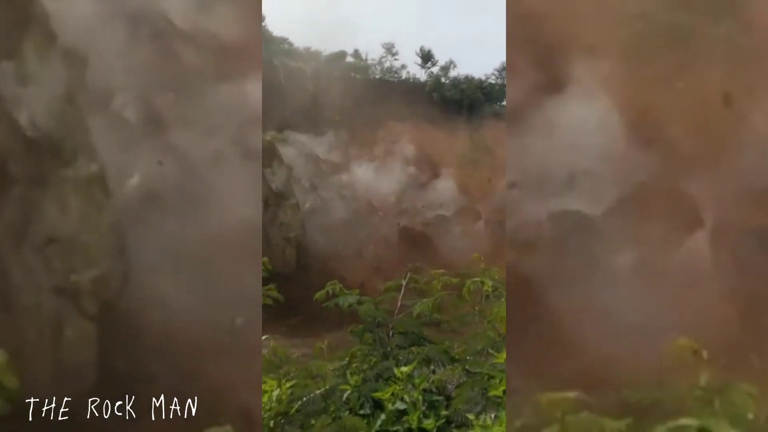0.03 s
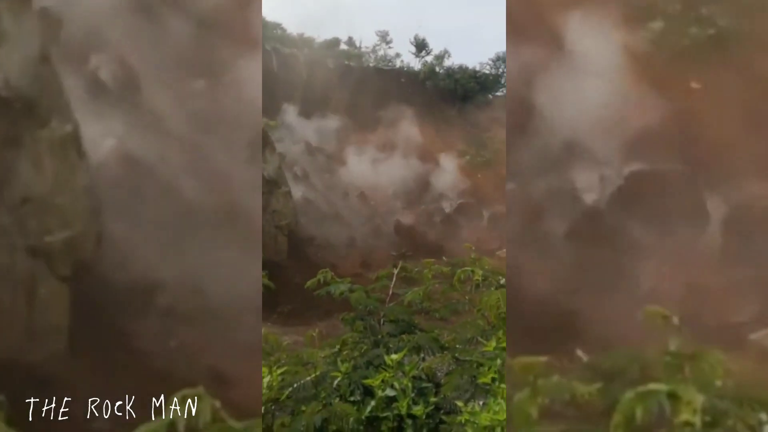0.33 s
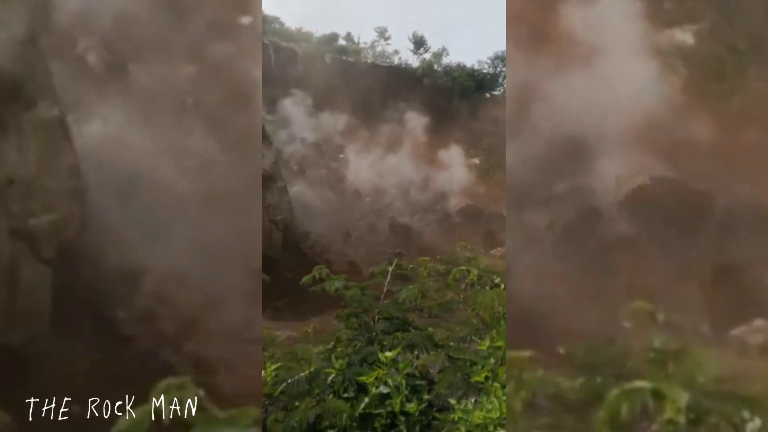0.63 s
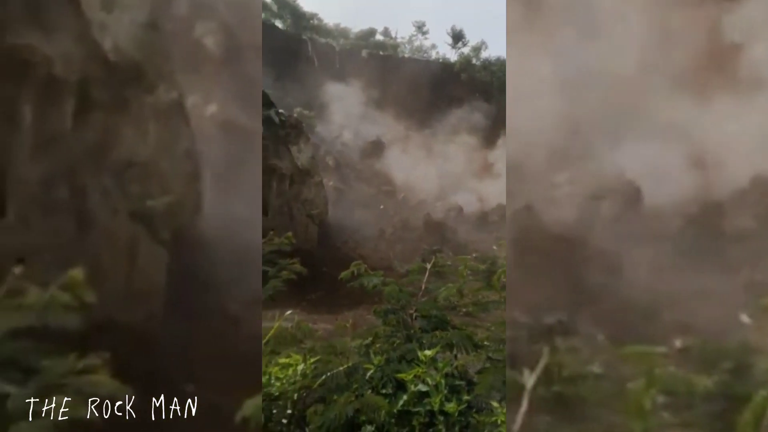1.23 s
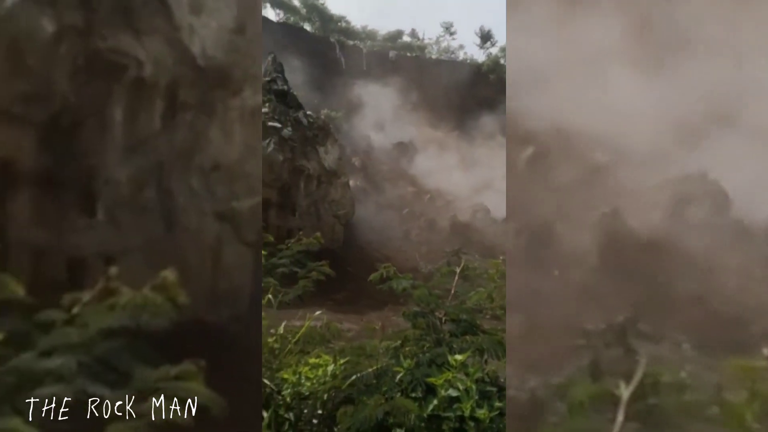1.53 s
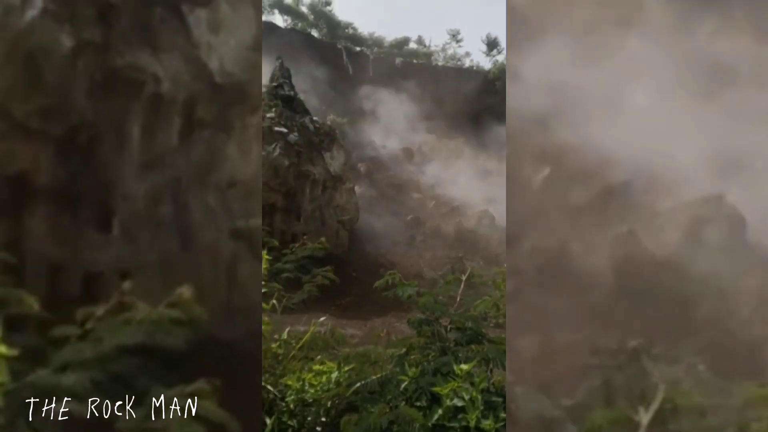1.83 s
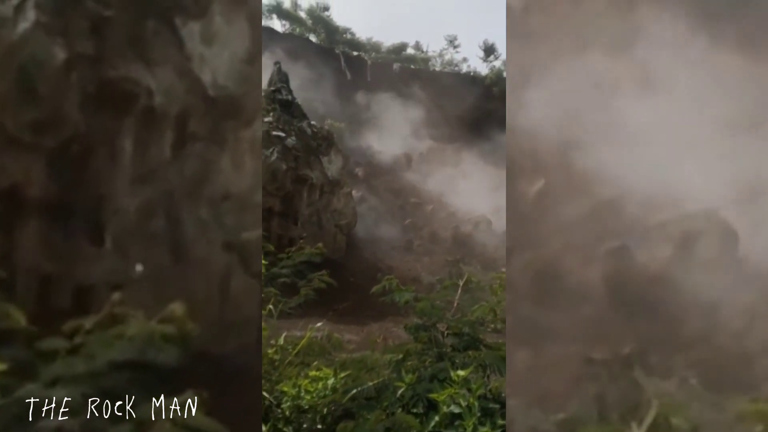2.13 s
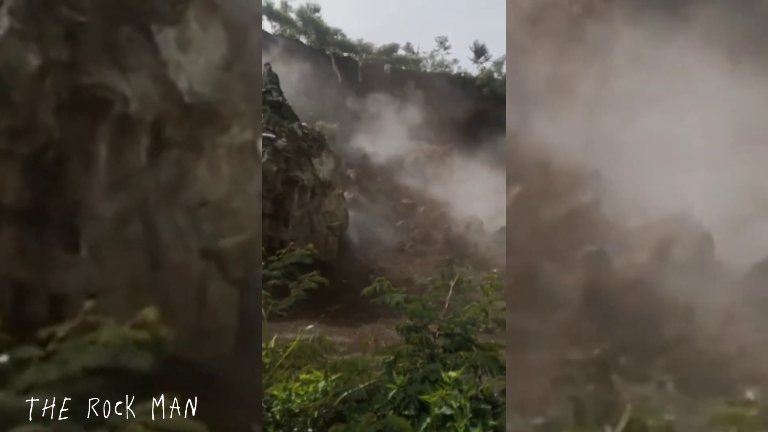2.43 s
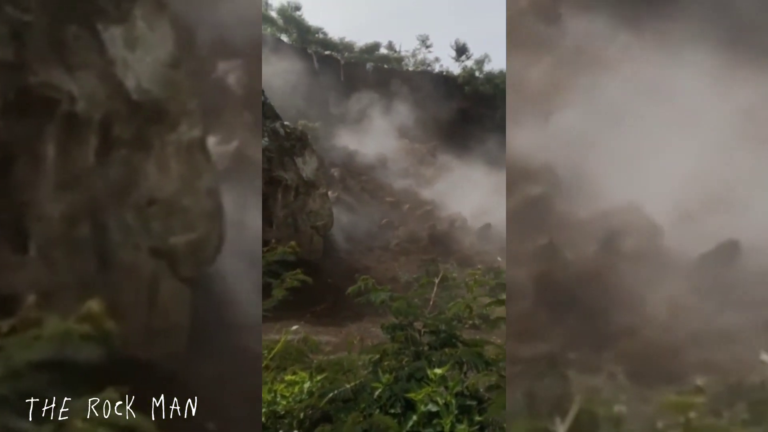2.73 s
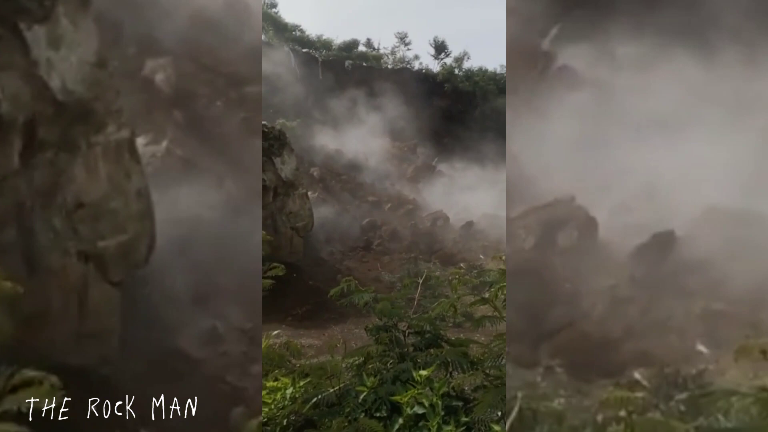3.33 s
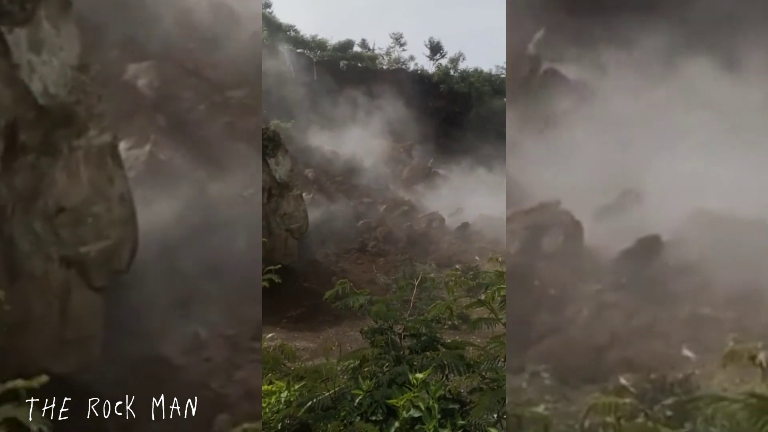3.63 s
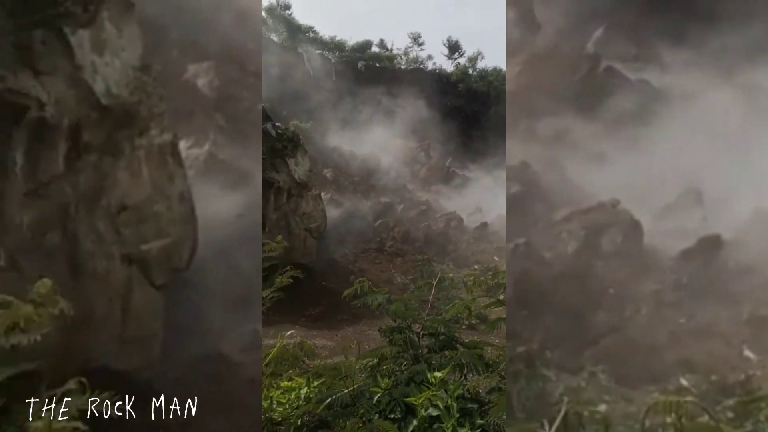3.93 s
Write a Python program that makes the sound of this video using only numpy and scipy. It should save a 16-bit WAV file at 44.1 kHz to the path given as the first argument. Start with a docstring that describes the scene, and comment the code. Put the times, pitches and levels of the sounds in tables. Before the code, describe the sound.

A landslide rumbles down a cliff with thudding boulders and clattering rubble, gradually settling.

```python
"""A landslide runs out down a quarry cliff, heard from the foot of the slope on a phone's two microphones.
It opens in full flow: countless blocks rumble, rubble clatters, gravel slides, grit and rock chips hiss.
At once stones knock and pebbles tick close by; then boulders tumble in bursts of thuds, heaviest
in the first two seconds. After that the flow thins out as the slope settles, and single stones
and a few late boulders knock through to the end."""
import sys
import numpy as np
from scipy import signal
from scipy.fft import rfft, irfft
from scipy.io import wavfile
from scipy.ndimage import uniform_filter1d

SR = 44100
rng = np.random.default_rng(int(sys.argv[2]) if len(sys.argv) > 2 else 0)


def dump_mix(stems):
    """Bounce the given channels to the path in sys.argv[1] as a 16-bit WAV at rate SR."""
    frames = np.atleast_2d(stems).T  # one column per channel
    limited = np.clip(frames, -1, 1)  # hard clip at full scale
    pcm = np.round(limited * 32767).astype(np.int16)
    wavfile.write(sys.argv[1], SR, pcm)


N = 176400


def undb(db):
    """Decibels to gain."""
    return 10 ** (np.asarray(db) / 20)


def curve(rows):
    """Rows of (t/s, value) joined by straight lines."""
    return np.interp(np.arange(N) / SR, *np.array(rows).T)


def across(rows):
    """Rows of (f/Hz, value) joined on a log frequency axis."""
    hz, value = np.array(rows, float).T
    return np.interp(np.log(np.fft.rfftfreq(N, 1 / SR) + 1), np.log(hz + 1), value)


def colour(x, spectrum):
    """Causal filter of unit power with the outline (f/Hz, level/dB)."""
    gain = undb(across(spectrum))
    gain /= np.sqrt(np.mean(gain ** 2))
    cepstrum = irfft(np.log(gain), N)
    cepstrum[1:N // 2] *= 2  # fold to minimum phase
    cepstrum[N // 2 + 1:] = 0
    return irfft(rfft(x) * np.exp(rfft(cepstrum)), N)


def surge(per_s=69):
    """Smooth random wandering with a spread of 1."""
    width = int(SR / per_s)
    wander = rng.standard_normal(N)
    for _ in range(2):
        wander = uniform_filter1d(wander, width, mode="wrap")
    return wander / wander.std()


def ring(hz, t60, attack):
    """One damped vibration with a soft start; times in seconds."""
    t = np.arange(SR // 4) / SR
    return np.sin(2 * np.pi * hz * t) * undb(-60 * t / t60) * (1 - np.exp(-t / attack))


def burst(t60, seconds):
    """Noise that dies away by 60 dB in t60 seconds."""
    t = np.arange(int(seconds * SR)) / SR
    return rng.standard_normal(len(t)) * undb(-60 * t / t60)


def add(out, at, sound):
    """Mix a sound in at a time in seconds."""
    i = int(at * SR)
    out[i:i + len(sound)] += sound[:max(N - i, 0)]


def pan(left_db):
    """Two gains that put the left left_db above the right."""
    return undb(np.array([[.5], [-.5]]) * left_db)


# The phone's microphones, left over right: f/Hz, level/dB
MIC_BALANCE = [(150, 0), (300, 0.5), (430, 1.95), (560, 12), (790, 4), (950, 11), (1130, 2), (1350, 5),
               (1520, 5.5), (1700, 0.7), (1930, 3.5), (2160, -3), (2420, 1), (2700, 3.5), (3050, 2.14),
               (3500, 4.1), (4300, 9.9), (5200, 7), (7000, 7.1), (12000, 11.6)]
# Lead of the left microphone: f/Hz, phase/rad
MIC_LEAD = [(0, 0), (130, .36), (260, 1.2), (520, 2.5), (800, 0), (1000, 6.5), (1300, 7.5), (2000, 7),
            (2500, 8.5), (3500, 10.5), (4600, 12), (5800, 15.5), (7600, 21.5)]
# Likeness of the two: f/Hz, coherence/0-1
MIC_LIKENESS = [(100, .999), (300, 0.91), (480, 0.88), (650, 0.63), (880, 0.098), (1050, 0.65),
                (1450, 0.94), (1700, 0.58), (2500, 0.66), (3500, 0.14), (8000, 0.12)]
def microphones(direct, scattered=None):
    """The right microphone hears later and shaded, with a share of any sound scattered by the cliff."""
    lag = np.interp(np.fft.rfftfreq(N, 1 / SR), *np.array(MIC_LEAD).T)
    right = rfft(direct) * np.exp(-1j * lag)
    if scattered is not None:
        alike = across(MIC_LIKENESS)
        right = alike * right + np.sqrt(1 - alike ** 2) * rfft(scattered)
    return np.array([direct, irfft(right * undb(-across(MIC_BALANCE)), N)])


def debris(flow, spectrum, gain_db, hits_per_s, spread_db, surge_db):
    """Random impacts that surge as the mass slides; spread_db lifts a few above the many weak ones."""
    strength = undb(spread_db * np.minimum(rng.exponential(size=(2, N)), 5))
    lands = rng.random((2, N)) < hits_per_s / SR
    hits = lands * strength * rng.choice([-1, 1], (2, N))
    direct, scattered = colour(hits / hits.std(), spectrum)
    return microphones(direct, scattered) * undb(curve(flow) + gain_db + surge_db * surge())


# Deepest bass at the foot of the slope: t/s, level/dB
GROUND_FLOW = [(0.0, -23.5), (0.3, -31), (0.44, -28.5), (0.7, -19), (0.76, -30.5), (1.0, -23), (1.38, -40),
               (1.41, -23.5), (1.87, -40), (1.96, -31), (3.32, -45), (3.4, -25.5), (3.55, -43), (4.0, -53)]
# Its spectrum: f/Hz, level/dB
GROUND_SPECTRUM = [(12, -16), (25, -10.5), (43, 6.5), (60, -3), (90, -3), (160, -76.5)]
def ground():
    """Impacts of equal strength blur into the deep bass of the heavy mass."""
    return debris(GROUND_FLOW, GROUND_SPECTRUM, gain_db=.5, hits_per_s=370, spread_db=0, surge_db=.5)


# The mass coming down the cliff: t/s, level/dB
RUMBLE_FLOW = [(0, -17), (.55, -19), (.7, -22.5), (.82, -20), (.95, -24), (1.14, -22.5), (1.24, -25.5),
               (1.33, -18.5), (1.5, -20), (1.6, -22.5), (1.82, -26.5), (1.95, -19.5), (2.08, -26),
               (2.36, -24), (2.46, -31), (3.25, -29.5), (3.33, -38.5), (3.44, -26.5), (3.59, -29.5),
               (3.75, -31.5), (4, -33)]
# Its spectrum: f/Hz, level/dB
RUMBLE_SPECTRUM = [(35, -17.5), (65, -3.5), (95, -2), (140, -1), (220, -4.5), (320, -5), (440, -16),
                   (560, -11.5), (1200, -71.5)]
def rumble():
    """Countless blocks collide and merge into a low rumble."""
    return debris(RUMBLE_FLOW, RUMBLE_SPECTRUM, gain_db=-1.5, hits_per_s=1600, spread_db=1.38, surge_db=1)


# Rubble on the slope: t/s, level/dB
RUBBLE_FLOW = [(0, -29.5), (.45, -30), (.53, -27.5), (.8, -31), (1.12, -31), (1.24, -33), (1.43, -32),
               (1.7, -35), (2.3, -37), (2.45, -40), (2.88, -39), (3.12, -36), (3.29, -42), (3.55, -38),
               (3.72, -37.5), (3.79, -40), (3.87, -37), (4, -37)]
# Its spectrum: f/Hz, level/dB
RUBBLE_SPECTRUM = [(200, -22), (400, -0.5), (520, -0.5), (660, 0), (790, -2.5), (960, 1), (1060, 0),
                   (1190, -7.5), (1350, -3), (1530, -2), (1700, -9), (1900, -9.5), (2400, -20), (4000, -60)]
def rubble():
    """Broken rock clatters in the midrange, in hits of nearly even strength."""
    return debris(RUBBLE_FLOW, RUBBLE_SPECTRUM, gain_db=5.5, hits_per_s=2500, spread_db=.5, surge_db=1.33)


# Gravel on the slope: t/s, level/dB
GRAVEL_FLOW = [(0, -27), (.45, -26.5), (.64, -25), (.8, -28.5), (1.15, -25), (1.21, -31), (1.36, -28.5),
               (1.5, -26.5), (1.61, -32), (2, -34.5), (2.4, -41), (2.65, -39), (3.2, -42.5), (4, -41.5)]
# Its spectrum: f/Hz, level/dB
GRAVEL_SPECTRUM = [(700, -22), (1400, -4.5), (1690, -6.5), (1850, -0.5), (1980, 3.5), (2130, -1.5),
                   (2330, 0), (2620, -3.5), (3100, -7), (5000, -59)]
def gravel():
    """Sliding gravel rattles in uneven hits around 2 kHz."""
    return debris(GRAVEL_FLOW, GRAVEL_SPECTRUM, gain_db=2, hits_per_s=5000, spread_db=3, surge_db=.6)


# Grit running down: t/s, level/dB
GRIT_FLOW = [(0, -31.5), (.25, -30.5), (.58, -29.5), (.72, -36), (1, -36), (1.18, -37.5), (1.3, -33.5),
             (1.49, -34.5), (1.58, -37.5), (2.1, -39.5), (2.48, -42.5), (2.68, -40), (3.22, -46.5),
             (3.39, -43), (3.7, -45), (4, -46.5)]
# Its spectrum: f/Hz, level/dB
GRIT_SPECTRUM = [(1500, -16), (2750, 6.5), (2980, -2.5), (3200, 1), (3480, -0.5), (3800, 2), (4200, 0),
                 (5200, -1), (6250, -4), (6850, -1.5), (7600, -7), (8100, -16), (8400, -52)]
def grit():
    """Tiny impacts come so densely that they hiss."""
    return debris(GRIT_FLOW, GRIT_SPECTRUM, gain_db=5, hits_per_s=12000, spread_db=3, surge_db=.64)


# Rock chips spilling: t/s, level/dB
CHIPS_FLOW = [(0, -42), (.27, -31), (.6, -33), (.8, -35.5), (1.05, -37), (1.3, -50), (2.2, -55), (4, -64)]
# Their spectrum: f/Hz, level/dB
CHIPS_SPECTRUM = [(2500, -26.5), (3450, -14), (3750, -2.5), (4200, 2.5), (4620, 5.5), (5200, -7.5),
                  (6200, -22), (8500, -55.5)]
def chips():
    """Sharp chips spill with the first rush, a few hitting far harder than the rest."""
    return debris(CHIPS_FLOW, CHIPS_SPECTRUM, gain_db=-.5, hits_per_s=5400, spread_db=4.5, surge_db=.5)


# Sand running down: t/s, level/dB
SAND_FLOW = [(0, -61), (.6, -60), (.75, -66), (1.5, -67), (1.7, -68), (4, -80)]
# Its spectrum: f/Hz, level/dB
SAND_SPECTRUM = [(9500, -25), (10700, 3), (14500, 0)]
def sand():
    """Falling grains fizz faintly above 10 kHz."""
    return debris(SAND_FLOW, SAND_SPECTRUM, gain_db=9, hits_per_s=10000, spread_db=2, surge_db=.7)


# Stones knocking on the quarry rock: t/s, level/dB, f/Hz, extra level of the crack/dB
STONE_KNOCKS = [(.051, -8, 933, 2), (.073, -13, 1020, 10.5), (.201, -18, 1990, 2), (.252, -10.5, 1897, 7),
                (.324, -11.5, 1920, 2), (.387, -21, 2174, 12), (0.497, -14, 1288, -12),
                (.508, -11, 1366, 8), (0.521, -13, 1380, 4.5), (.622, -9.5, 1944, 4.5),
                (.898, -14.5, 1970, -8), (1.028, -20, 2335, 5), (1.118, -21.5, 1223, -2),
                (1.154, -16.5, 960, 7), (1.564, -16.5, 970, 0), (1.715, -36, 1520, 11),
                (2.547, -21, 927, 4), (2.735, -20, 505, -8), (3.032, -30, 980, -8), (3.107, -17, 570, -3),
                (3.154, -24.5, 1350, 6), (3.19, -21, 570, -9), (3.358, -24.5, 1566, 9),
                (3.389, -25, 2640, 6), (3.445, -21, 910, -13), (3.639, -23, 1050, -12),
                (3.714, -20, 1078, -17.5), (3.808, -11, 544, -18)]
# Ring of a stone: ratio to its pitch, level/dB
STONE_MODES = [(1, 4), (1.3, -8), (1.659, -2), (1.88, -22)]
# Crack of a stone: f/Hz, level/dB
CRACK_SPECTRUM = [(300, -12.5), (900, 2.5), (2400, 3), (4500, -2.5), (7000, -16), (8500, -43)]
def stones(mode_scatter=.092, pieces=2):
    """Each stone knocks with a crack and a brief ring; weaker pieces land just after."""
    rings, cracks = np.zeros(N), np.zeros(N)
    for at, db, hz, crack_db in STONE_KNOCKS:
        for ratio, mode_db in STONE_MODES:
            mode_hz = hz * ratio ** (1 + mode_scatter * rng.standard_normal())
            add(rings, at, undb(db + mode_db) * ring(mode_hz, t60=.061, attack=.0004))
        splinters = [(late, -13.5) for late in rng.uniform(0, .022, pieces)]
        for late, piece_db in [(.00023, 0)] + splinters:
            add(cracks, at + late, undb(db + crack_db + piece_db) * burst(t60=.024, seconds=.2))
    return microphones(rings * undb(-6.5) + colour(cracks, CRACK_SPECTRUM) * undb(-9))


# Pebbles close to the phone: t/s, level/dB, 60 dB decay/s
PEBBLE_TICKS = [(0.088, -12.5, 0.026), (0.201, -13, 0.028), (.252, -11, 0.021), (.3875, -2, 0.0039),
                (.392, -13, .004), (1.239, -18, .003), (1.258, -10, 0.0036), (1.285, -18.5, 0.035),
                (1.478, -20.5, 0.17), (2.657, -27, 0.1), (3.357, -32, 0.016), (3.389, -32, 0.024)]
# Their spectrum: f/Hz, level/dB
TICK_SPECTRUM = [(1500, -23), (3000, -11), (4500, 5.5), (6000, 7.5), (7300, 5), (8400, -15.5), (10000, -34),
                 (14000, -18)]
def pebbles():
    """Pebbles land in bright ticks and short sprays."""
    ticks = np.zeros(N)
    for at, db, t60 in PEBBLE_TICKS:
        add(ticks, at, .5 * undb(db) * burst(t60, seconds=.1))
    return microphones(colour(ticks, TICK_SPECTRUM))


# Boulders tumbling down the slope: t/s, level/dB, f/Hz, length of the tumble/s
BOULDER_TUMBLES = [(.255, -13.5, 95, 0.024), (.295, -10.5, 207, 0.031), (0.657, -7.5, 132, 0.04),
                   (0.698, -9.5, 210, .06), (.77, -14, 233, 0.098), (.94, -14, 129, 0.027),
                   (1.01, -16, 207, 0.064), (1.304, -10.5, 120, 0.059), (1.388, -10.5, 298, 0.048),
                   (1.41, -16.5, 469, .04), (1.514, -12.5, 245, 0.044), (1.702, -16, 112, 0.028),
                   (1.895, -18, 116, .025), (1.922, -10.5, 109, .03), (1.943, -8.5, 106, 0.038),
                   (1.96, -15.5, 259, 0.049), (2.014, -15, 93, 0.0297), (2.15, -22, 75, 0.026),
                   (2.255, -21, 75, .04), (2.321, -19.5, 110, 0.038), (2.387, -20.5, 166, 0.019),
                   (2.396, -20, 316, .03), (2.742, -23, 103, 0.026), (3.079, -13, 306, 0.0203),
                   (3.104, -20, 323, 0.022), (3.41, -20.5, 149, .03), (3.439, -14.5, 137, 0.0289),
                   (3.484, -14, 249.5, 0.01205), (3.72, -24.5, 302, 0.037), (3.829, -25.5, 136, 0.03)]
def boulders(rebounds=4, rebound_db=-8, pitch_scatter=.26, t60=.072, attack=.0035):
    """Each boulder lands with a thud and rolls on with weaker ones of scattered pitch."""
    thuds = np.zeros(N)
    for at, db, hz, length in BOULDER_TUMBLES:
        add(thuds, at, undb(db) * ring(hz, t60, attack))
        for k, (late, detune) in enumerate(rng.random((rebounds, 2))):
            rebound_hz = hz * np.exp(pitch_scatter * (2 * detune - 1))
            rebound_at = at + length * (k + late) / rebounds
            add(thuds, rebound_at, undb(db + rebound_db) * ring(rebound_hz, t60, attack))
    return microphones(thuds * undb(4.5))


# The last stones coming to rest: t/s, level/dB
SETTLE_FLOW = [(0, -66), (2, -43.5), (3.1, -39), (3.28, -44), (3.38, -37.5), (3.5, -40), (3.7, -35),
               (3.82, -43.5), (4, -39.5)]
# Their spectrum: f/Hz, level/dB
SETTLE_SPECTRUM = [(800, -28.5), (1100, -4.5), (1350, -10), (1650, 2.5), (1900, -2), (2200, -5),
                   (2400, -26), (2900, -18), (3150, -3), (3520, -14.5), (3750, -5.5), (4100, -24),
                   (8000, -40)]
def settling():
    """Sparser impacts emerge to the right of the phone as the slope settles."""
    hits = debris(SETTLE_FLOW, SETTLE_SPECTRUM, gain_db=-1.5, hits_per_s=500, spread_db=3.5, surge_db=1.5)
    return hits * pan(left_db=-12.5)


# Drift of the fine debris across the phone, left over right: t/s, level/dB
FINE_DRIFT = [(0, 5.5), (.7, 2.5), (1.4, -3.5), (2.5, -2), (4, -2)]
def scene():
    """From the foot of the slope: the heavy mass, finer debris surging together, and single rocks."""
    heavy = ground() + rumble()
    fine = rubble() + gravel() + grit() + chips() + sand()
    last_stones = settling()
    fine *= undb(surge()) * pan(curve(FINE_DRIFT))  # a shared surge of about 1 dB
    rocks = boulders() + stones() + pebbles()
    return heavy + fine + rocks + last_stones


def record(dry, bass_hz=10, ceiling=.95, top_hz=14500):
    """The deepest bass and the top are cut, and the loudest peaks are softly rounded."""
    full = signal.sosfilt(signal.butter(2, bass_hz, "high", fs=SR, output="sos"), dry)
    rounded = full / (1 + (full / ceiling) ** 6) ** (1 / 6)
    return signal.sosfilt(signal.ellip(8, .2, 70, top_hz, fs=SR, output="sos"), rounded)


dry = scene()
out = record(dry)
dump_mix(out)
```